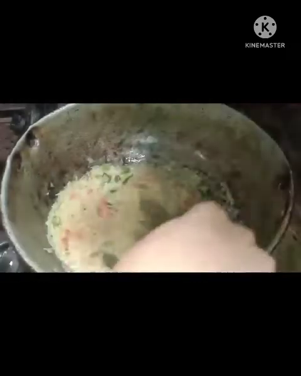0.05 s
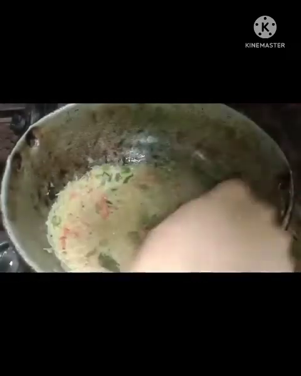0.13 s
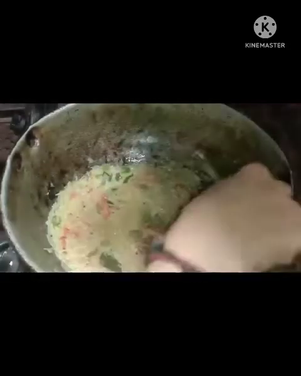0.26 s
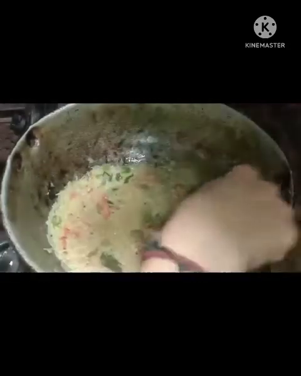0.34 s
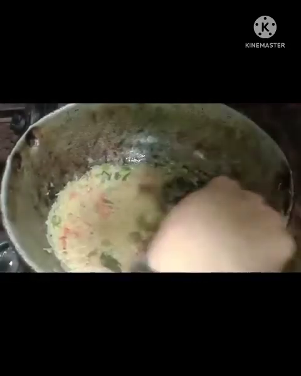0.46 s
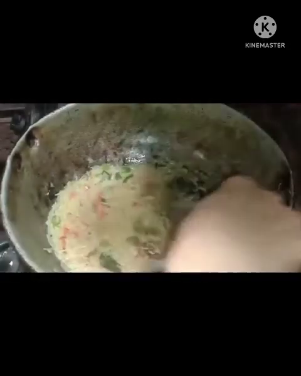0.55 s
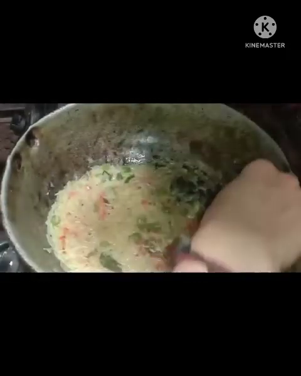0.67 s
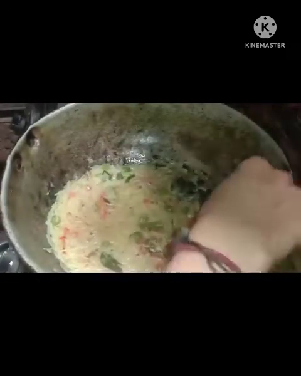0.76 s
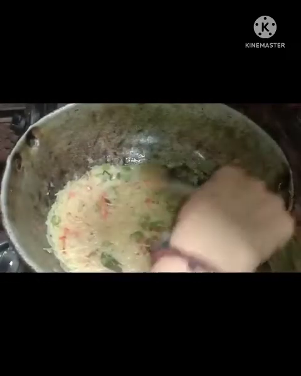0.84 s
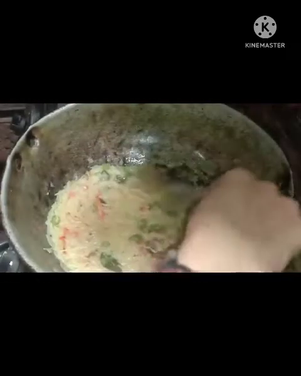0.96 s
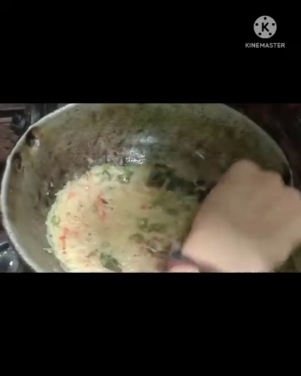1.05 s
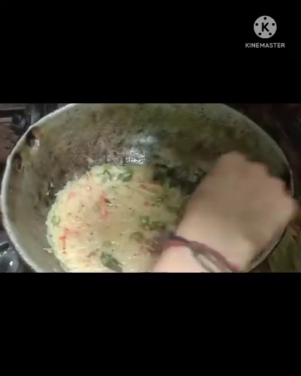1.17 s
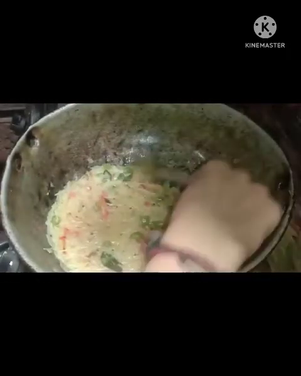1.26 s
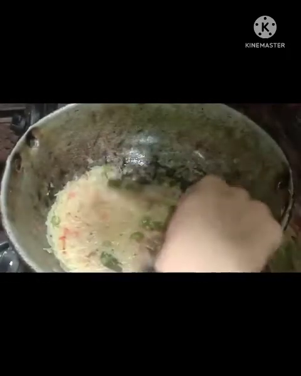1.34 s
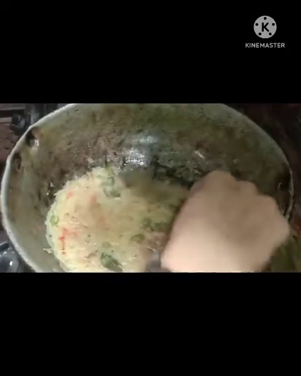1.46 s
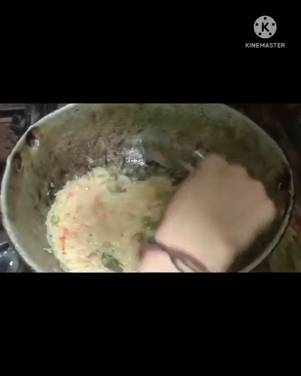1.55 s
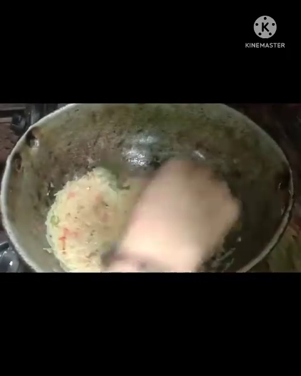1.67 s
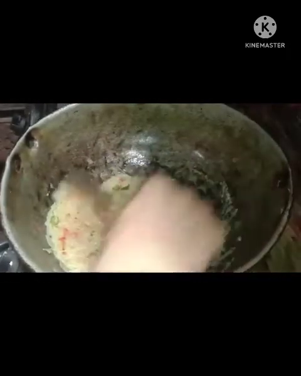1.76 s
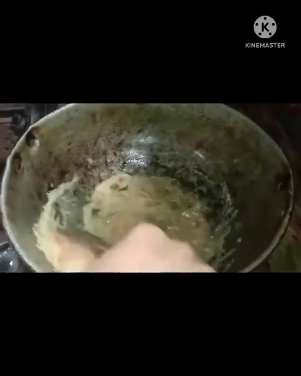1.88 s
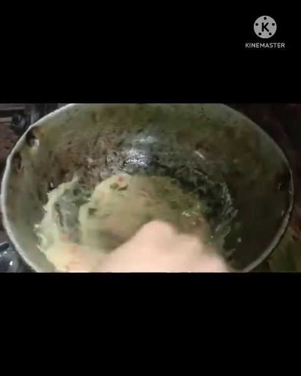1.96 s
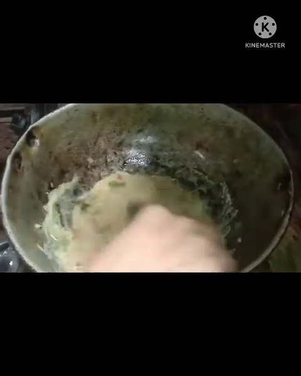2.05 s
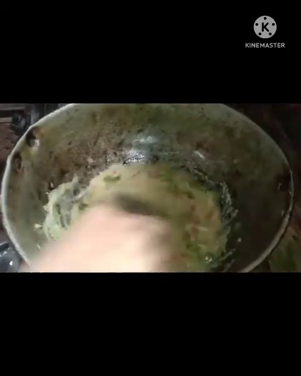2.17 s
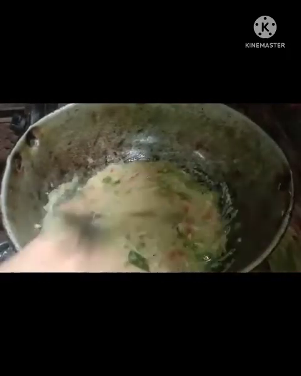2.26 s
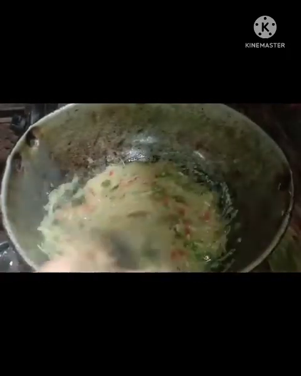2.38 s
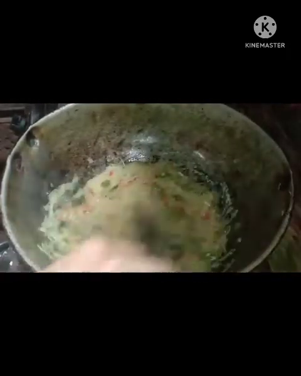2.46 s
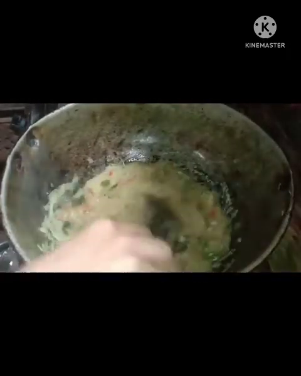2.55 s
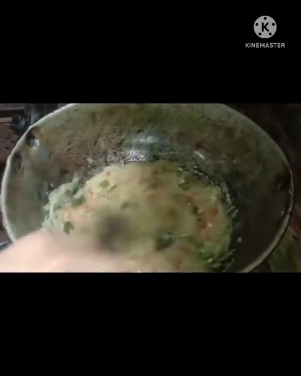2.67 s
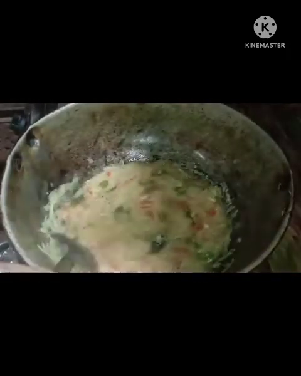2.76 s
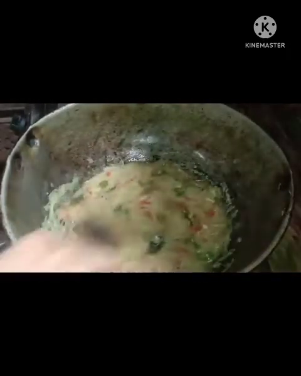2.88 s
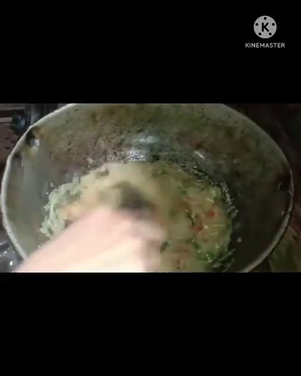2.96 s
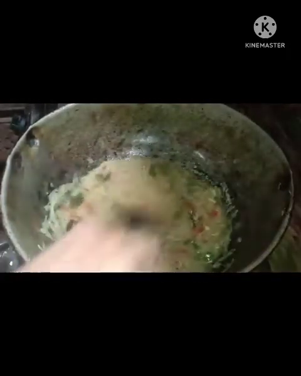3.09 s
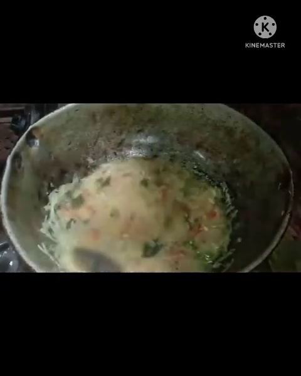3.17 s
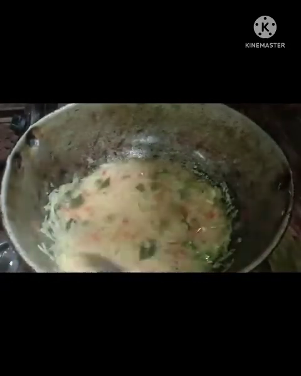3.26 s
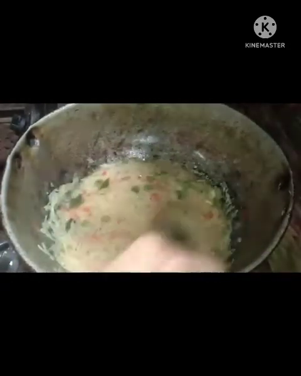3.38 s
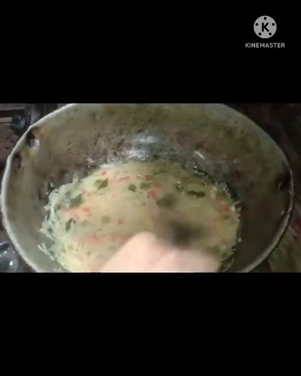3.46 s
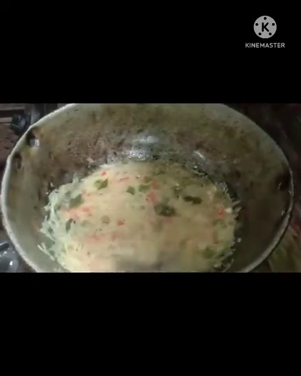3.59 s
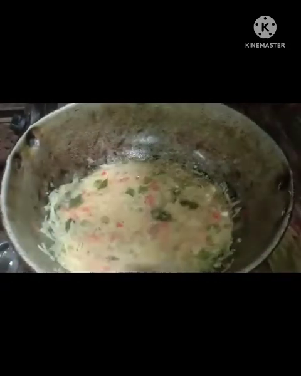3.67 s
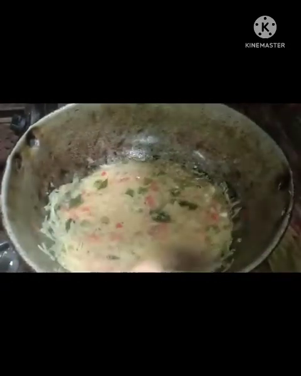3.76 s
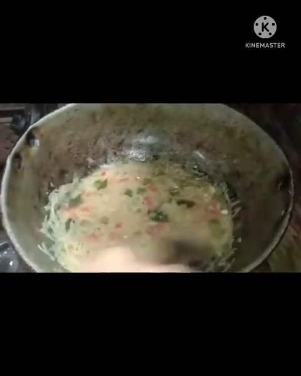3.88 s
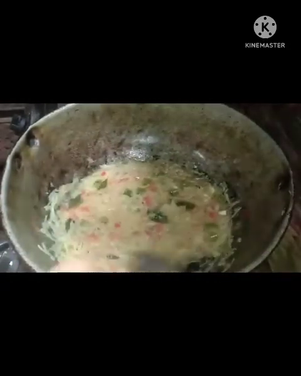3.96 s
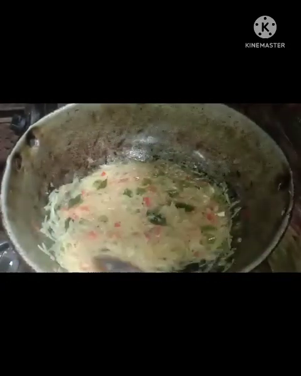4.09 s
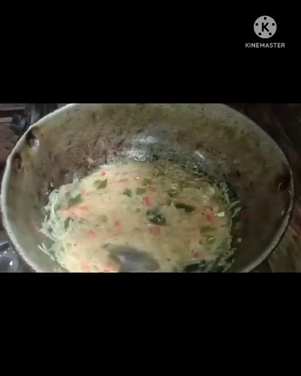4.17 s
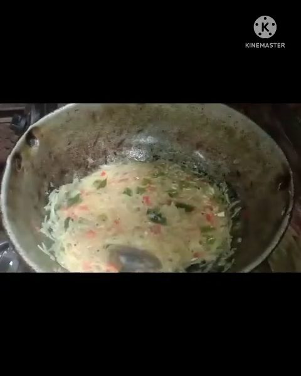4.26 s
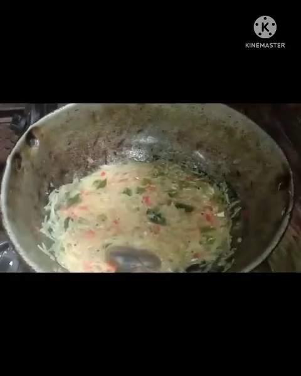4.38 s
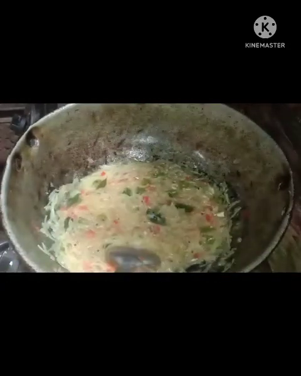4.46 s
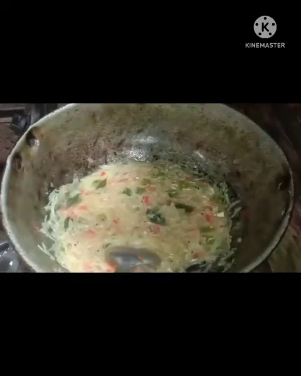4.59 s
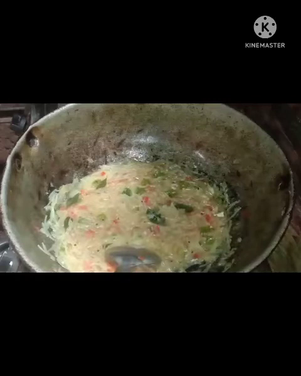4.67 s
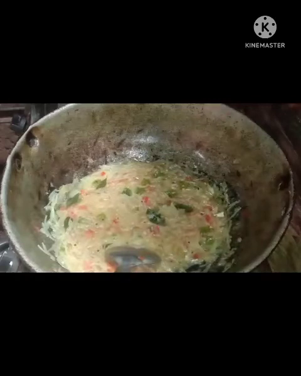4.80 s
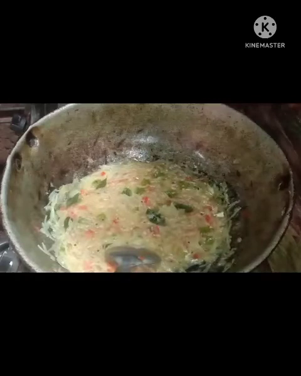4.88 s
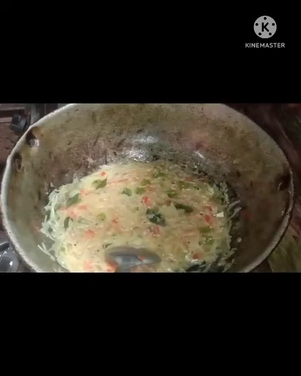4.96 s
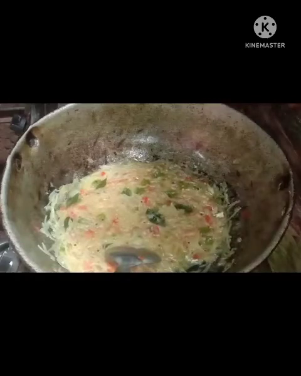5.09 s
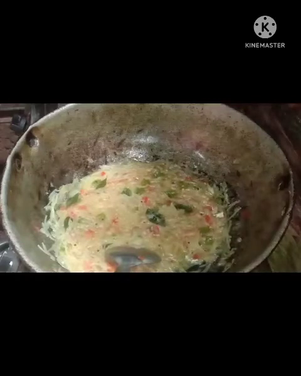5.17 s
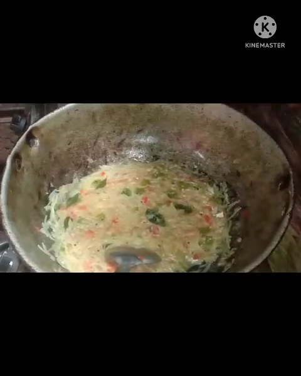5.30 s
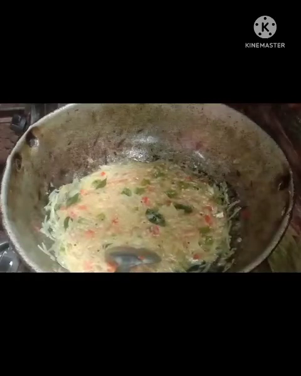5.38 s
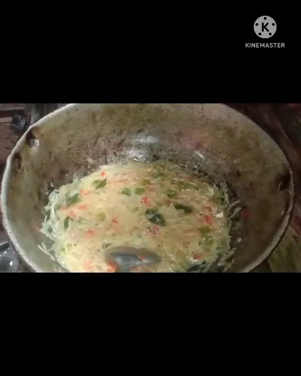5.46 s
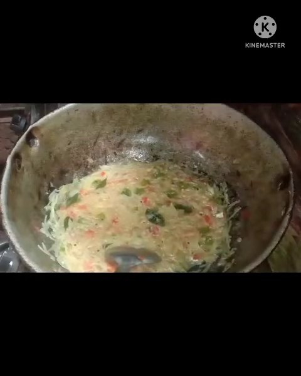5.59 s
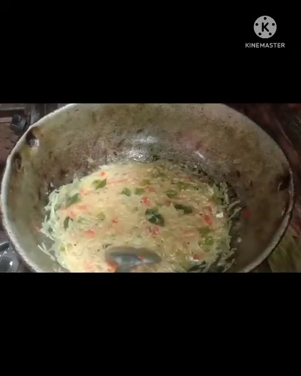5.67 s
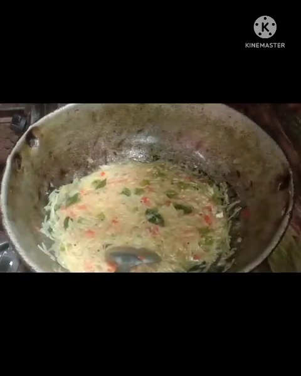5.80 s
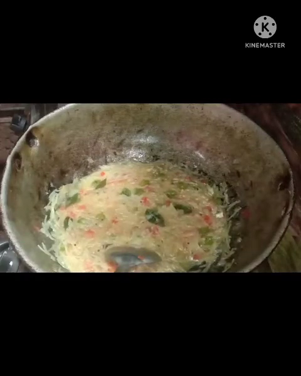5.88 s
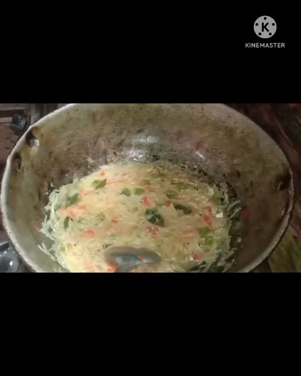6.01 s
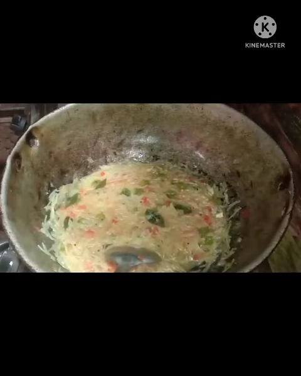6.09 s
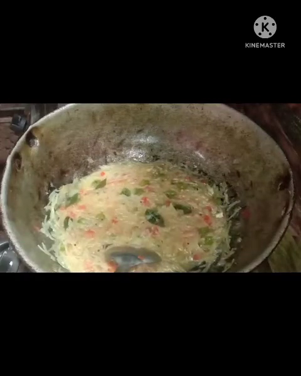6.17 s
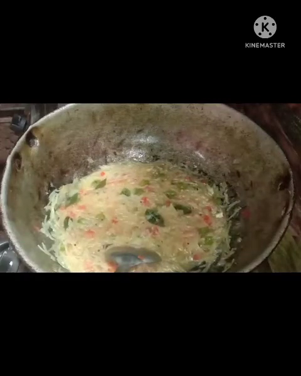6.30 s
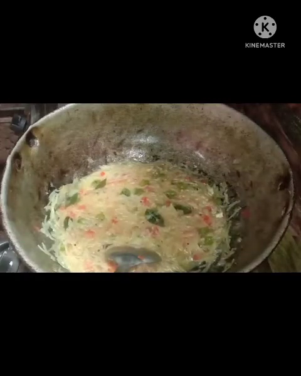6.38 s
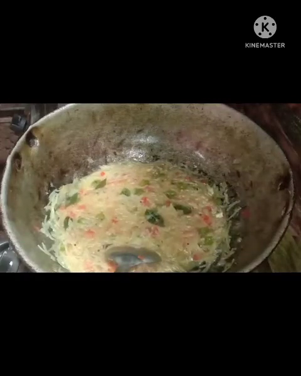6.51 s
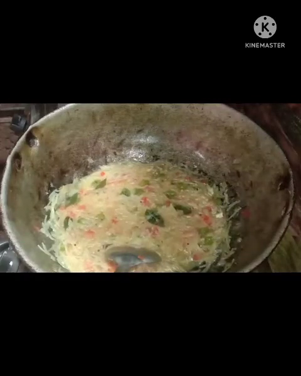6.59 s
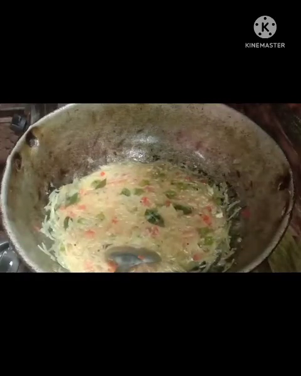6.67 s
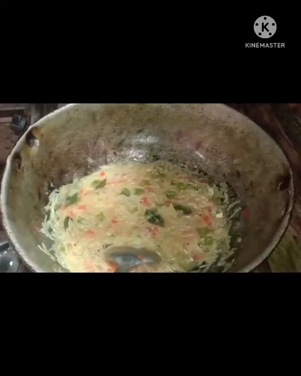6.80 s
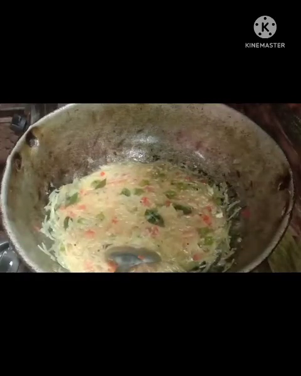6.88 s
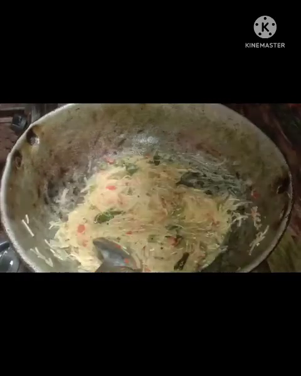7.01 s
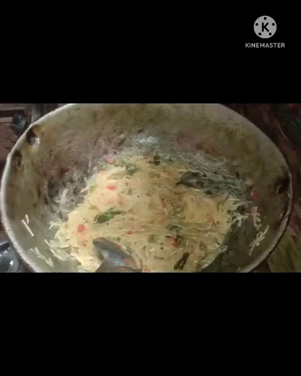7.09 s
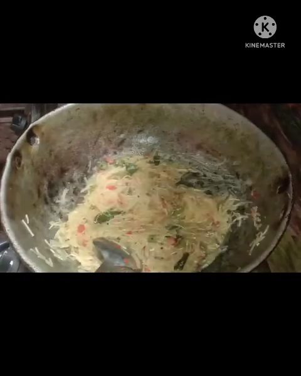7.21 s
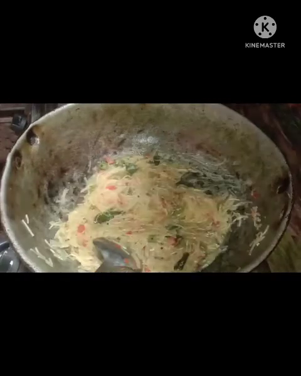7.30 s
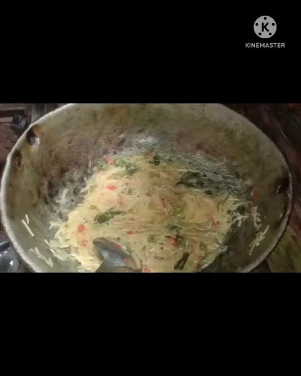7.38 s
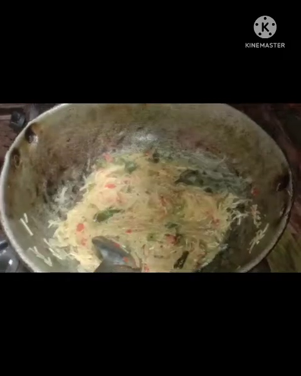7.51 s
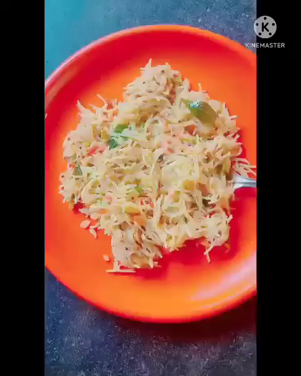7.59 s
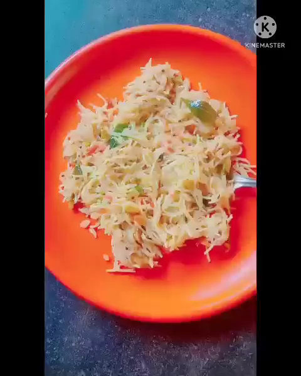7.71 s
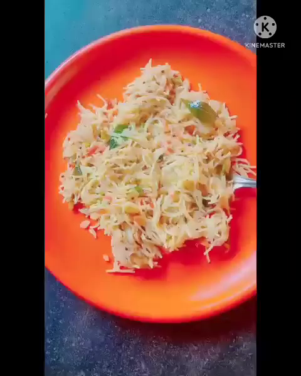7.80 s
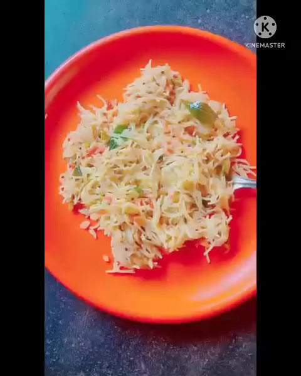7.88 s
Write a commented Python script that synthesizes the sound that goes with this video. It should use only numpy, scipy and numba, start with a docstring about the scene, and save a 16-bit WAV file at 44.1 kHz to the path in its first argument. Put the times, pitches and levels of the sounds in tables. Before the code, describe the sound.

Brisk stirring of noodles in a metal wok, heard very near with a short room tail. Dense clanks with little ring alternate with rough scrapes and tiny metallic chirps, over a faint simmer. The spatula stops around four seconds, leaving soft frying crackles, occasional droplet snaps and an airy hiss. Around seven seconds the sound drops out for a moment, returns, then ends abruptly before faint room noise.

```python
"""Stirring noodles in a wok

A metal spatula stirs moist noodles in a heavy metal wok, close up in a small kitchen. Each blow rings
dense noise, wok and blade modes; scrapes drive the wok with slips and gritty pings, and squeaks are narrow noise.
Under it all, and alone once the spatula rests, food sizzles in clicks and pings with a hollow, noisy steam hiss.
Near the end the level dips briefly; later the sound is cut off, and a faint low room noise fades in.
"""
import sys
import numpy as np
from scipy import signal
from scipy.fft import rfft, irfft
from scipy.io import wavfile
from numba import njit

SR = 44100
rng = np.random.default_rng(int(sys.argv[2]) if len(sys.argv) > 2 else 0)


def int16_out(signal):
    """Quantize to a 16-bit WAV file."""
    q = np.round(np.clip(np.atleast_2d(signal).T, -1, 1) * 32767)
    wavfile.write(sys.argv[1], SR, q.astype(np.int16))


N = 350506
TIME = np.arange(N) / SR
RING_TIME = np.arange(SR // 3) / SR

# All levels are relative mix levels, ahead of the fader.
# The blade lands; the last level is the spatula's own ring:
# start_s, body_db, clank_db, edge_db, spatula_db
BLOWS = [(0.2644, -23.5, -31.5, -26.5, -36.5), (0.328, -29.5, -36.5, -37, -35.5),
         (0.382, -26, -30.5, -28.5, -49.5), (0.4645, -34.5, -43.5, -42.5, -48.5),
         (0.7179, -27, -33, -26.5, -46), (0.800, -34.5, -37, -40, -38), (1.1222, -25.5, -36.5, -32, -49.5),
         (1.414, -51.5, -49, -65.5, -50.5), (1.438, -42, -43, -68.5, -48), (1.556, -23.5, -32, -26, -44),
         (1.701, -36, -42, -25, -61.5), (1.833, -40, -47, -38, -42), (1.9144, -50.5, -48, -69, -58),
         (2.015, -37, -47, -45, -58), (2.184, -34, -41, -38, -52), (2.487, -46, -60, -30.5, -54),
         (2.868, -41, -41, -38, -58.5), (2.892, -36.5, -30.5, -44.5, -46), (3.3425, -39, -34, -41.5, -35.5),
         (3.388, -37, -33.5, -38, -42), (3.506, -42, -41.5, -39, -55.5), (3.527, -45.5, -35, -34.5, -48.5),
         (3.576, -56, -46, -67, -59.5), (3.621, -59, -54, -41, -46), (3.633, -37, -29, -27.5, -34.5),
         (3.672, -42, -41.5, -51, -46.5), (4.337, -61, -48, -45.5, -41)]
# The blade is pushed along the wok; the faint, dull rows are noodles slumping after a stroke.
# Each is at full strength from full_s after a swell: full_s, swell_s, held_s, body_db, clank_db, edge_db
STROKES = [(0.333, 0.0058, 0.0073, -39, -34.5, -33.5), (0.391, .008, 0.027, -39, -41, -32),
           (0.48, 0.016, 0.047, -52, -60, -75.5), (0.74, .01, 0.043, -43, -51, -42),
           (0.80, .04, 0.05, -32, -37, -27.5), (1.14, 0.011, 0.11, -40, -47.5, -37),
           (1.255, .03, 0.049, -32, -34.5, -28), (1.445, .012, 0.0045, -41.5, -48, -65),
           (1.48, 0.024, 0.067, -52.5, -65, -75), (1.585, 0.0083, .055, -42, -53, -39),
           (1.668, 0.024, 0.11, -30.5, -37.5, -29.5), (1.832, 0.0065, 0.0018, -45, -46, -54),
           (1.87, 0.021, .1, -55.5, -57, -74), (2.03, .016, 0.083, -33.5, -36.5, -31.5),
           (2.192, 0.031, 0.0034, -41, -40.5, -36), (2.505, 0.027, 0.012, -34.5, -32.5, -34),
           (2.895, 0.031, 0.072, -29, -34.5, -31), (3.398, .01, 0.0082, -30.5, -27, -31.5),
           (3.445, .02, 0.0045, -39, -56, -65), (3.533, 0.0063, 0.0033, -41, -41.5, -61)]
# How fast a stroke fades at its end: body_db_per_s, clank_db_per_s, edge_db_per_s
RELEASE_RATES = (273.5, 311.5, 351.5)
# The blade catches and chatters on one note: middle_s, pitch_hz, level_db, half_length_s
SQUEAKS = [(0.391, 2265, -27.5, 0.015), (0.413, 1940, -35, 0.033), (0.691, 5800, -52, 0.0074),
           (0.822, 2040, -37.5, 0.02), (0.86, 7260, -34.5, 0.022), (0.885, 4870, -37.5, 0.017),
           (1.288, 6250, -31, 0.013), (1.416, 1460, -44.5, 0.0056), (1.834, 2650, -37, 0.011),
           (2.1, 245, -41, .08), (2.523, 236.7, -37, 0.037), (2.906, 640, -23, 0.0074),
           (2.93, 242, -37, .05), (2.935, 475, -32.5, .04), (2.932, 4500, -37, 0.028),
           (2.964, 5960, -37, .014), (3.405, 1206, -34.5, 0.016)]
# Modes of the loaded wok and the blade, decay ahead of the sustain factor: pitch_hz, energy_db, t60_s
WOK_MODES = [(127.8, -9, 0.73), (247.2, 2.5, .15), (360.3, -1, 0.17), (441.5, 3, 0.18), (490, -3.5, 0.1),
             (623.4, -0.5, .19), (674, -3, 0.25), (854, -15, .14), (1050, -15.5, 0.32), (1160, -8.5, 0.12),
             (1255, 0.5, 0.11), (1396, -9.5, 0.36), (1520, -7, 0.13), (1820, -11, 0.096), (1884, -10, 0.12),
             (2296, -13, 0.13), (3162, -9, 0.14), (3385, -7.5, 0.11), (3650, -10.5, 0.062),
             (4090, -3.5, 0.068), (4280, -7.5, .1), (4860, -6, 0.091), (5270, -6, 0.14), (5990, -3.5, .12),
             (6200, -2, 0.096), (7610, 0, 0.06), (7630, -3.5, 0.063), (8500, -13.5, .16)]
# Modes of the spatula: pitch_hz, energy_db, t60_s
SPATULA_MODES = [(1040, -5, .2), (1170, -6.5, 0.11), (1617, -5.5, 0.071), (1720, -0.5, 0.095),
                 (1895, -5.5, 0.09), (2660, -8, .07), (3030, -5.5, .07), (3930, -5, .07)]
# Colour of the dense, quickly damped vibration between the wok's modes: pitch_hz, density_db_per_hz
WOK_COLOUR = [(40, -37), (90, -10.5), (170, -15), (245, -4), (300, -12.5), (500, 0.5), (720, -4),
              (1050, -8.5), (2500, -14), (4200, -6.5), (8000, -8.5), (9800, -19.5), (13700, -32),
              (15000, -17.5)]
# Body of the wok, clank of its wall, edge of the blade: low_hz, high_hz
REGISTER_BANDS = [(40, 900), (900, 2800), (2800, 16000)]
# Slow rise and fall of the simmer; at the very end the hiss level carries the low room noise too:
# time_s, frying_db, bubbling_db, hiss_db
SIMMER_LEVELS = [(0, -61.5, -63.5, -64), (0.798, -66, -68, -71.5), (2, -58.5, -69, -71),
                 (2.7, -64, -67, -71.5), (4.2, -63.5, -65.5, -72), (4.6, -60.5, -63.5, -74),
                 (5.9, -58.5, -63, -63), (6.9, -59, -64, -62), (7.1, -60, -75, -62.5), (7.5, -56, -74, -57),
                 (7.9, -76, -67, -66.5)]
# Single pops, high ones droplets, low ones pockets of steam: start_s, level_db, pitch_hz, t60_s
POPS = [(5.196, -51.5, 538, 0.11), (5.538, -44.5, 7520, 0.033), (5.689, -47, 504, 0.038),
        (6.206, -45.5, 7500, .02), (6.526, -46, 1238, 0.08), (7.344, -46, 7600, 0.013),
        (7.4167, -39, 7630, 0.02)]
# Colour of the frying droplets: pitch_hz, density_db_per_hz
FRYING_COLOUR = [(1200, -24), (2450, -11.5), (3700, -12), (4400, -4.5), (5300, -9), (5950, -3),
                 (6600, -11.5), (7200, 1.5), (7800, 1), (8800, -9), (10200, -19), (13600, -28.5),
                 (14500, -17.5), (15500, -16.5)]
# Colour of steam bubbling up through the noodles: pitch_hz, density_db_per_hz
BUBBLING_COLOUR = [(30, -26.5), (70, -10.5), (125, -4.5), (320, 0), (440, -7), (530, 3), (740, -5),
                   (880, -10.5), (1020, -4.5), (1400, -14.5), (1950, -11), (2400, -25)]
# Colour of the hollow hiss of steam escaping from the food, resonating in the wok:
# pitch_hz, density_db_per_hz
STEAM_COLOUR = [(30, -24), (120, -7), (220, -12), (900, -17.5), (1170, -10), (1255, 6), (1360, -13),
                (1480, -4.5), (1700, -15), (1920, -5.5), (2200, -21.5), (2450, -15.5), (3200, -16),
                (9000, -38)]
# The overall level dips, recovers, then is cut off and fades in again: time_s, gain_db
FADER = [(6.92, 1.5), (6.965, -16.5), (6.985, -45), (7.06, -25.5), (7.09, -4.5), (7.125, 2), (7.615, 1.5),
         (7.645, -75.5), (7.7, -46.5), (7.8, -20.5), (7.88, -6.5)]

REGISTER_FILTERS = [signal.butter(3, edges, "band", fs=SR, output="sos") for edges in REGISTER_BANDS]
SPEED_UP_DB_PER_S = 29  # the blade gathers speed during a push, and its edge grows brighter
BLOW_RING_DB = -3.5  # ring of the wok's modes against the dense body of a blow
TOP_HZ = 15600


def blows(mode_rings, thud):
    """The blade lands: a sharp clack, a short ring of wok and spatula, the kitchen's tail."""
    out = np.zeros(N)
    spatula = unit_energy(sum(undb(db) * ringing(hz, t60) for hz, db, t60 in SPATULA_MODES))
    for start_s, body_db, clank_db, edge_db, spatula_db in BLOWS:
        body, clank, edge = wok_response(mode_rings, thud, direct_db=-2.1, dense_t60=0.048,
                                         modes_db=BLOW_RING_DB, room_db=-10.5, room_t60=0.19, spot_db=3.0)
        blow = undb(body_db) * body + undb(clank_db) * clank + undb(edge_db) * edge
        blow = blow + undb(spatula_db) * spatula
        # a light touch stays in contact longer and so is duller
        blow = roll_off(blow, hz=20000 * undb(0.56 * (edge_db + 31)), kind="low")
        # the small wok radiates little deep bass
        blow = roll_off(blow, hz=70, kind="high")
        # a blow packs the energy of 8.4 ms of rubbing into one instant
        add(out, start_s, blow * np.sqrt(0.0084 * SR))
    return out


def strokes(mode_rings, thud):
    """Slips of the blade and grit under its edge tap the wok; faint, dull strokes are noodles slumping."""
    out = np.zeros(N)
    for full_s, swell_s, held_s, body_db, clank_db, edge_db in STROKES:
        t = RING_TIME - swell_s
        force = rubbing(len(t))
        # the grip of the edge flutters as it rides over crust and food
        force = force * undb(1.74 * walk(RING_TIME, per_s=150))
        # sliding hardly shakes the wok as a whole
        force = roll_off(force, hz=175, kind="high")
        registers = wok_response(mode_rings, thud, direct_db=1.5, dense_t60=0.014,
                                 modes_db=-3.0, room_db=-21, room_t60=0.2, spot_db=4.0)
        speed_db = SPEED_UP_DB_PER_S * (np.minimum(t, held_s) - held_s / 2)
        levels = (body_db, clank_db, edge_db + speed_db)
        for db, release, response in zip(levels, RELEASE_RATES, registers):
            # the colour shifts as the stroke travels over the wall
            gain = undb(db + 1.2 * walk(RING_TIME, per_s=60))
            gain = gain * pressure(t, swell_s, held_s, release)
            add(out, full_s - swell_s, signal.fftconvolve(force * gain, response))
    return out


def rubbing(count):
    """Raw friction force: dry slips, gritty pings and longer pings of chatter."""
    slips = undb(-7.5) * clicks(count, per_s=3000, spread_db=4.0)
    grit = undb(-7.0) * grains(count, per_s=4500, spread_db=3.5, t60=0.015, top_hz=15880)
    # the slips also lock briefly on to resonances
    chatter = undb(-9.0) * grains(count, per_s=900, spread_db=4.0, t60=0.05, top_hz=9000)
    return slips + grit + chatter


def pressure(t, swell_s, held_s, release_db_per_s):
    """Strength of one stroke: it swells until t = 0, holds, then lets up."""
    return np.clip(1 + t / swell_s, 0, 1) * undb(-release_db_per_s * np.maximum(t - held_s, 0))


def squeaks(width=0.039):
    """Brief, rough notes where the slips lock on to one resonance: swells of narrow-band noise."""
    out = np.zeros(N)
    for middle_s, hz, db, half_length_s in SQUEAKS:
        swell = np.hanning(int(2 * half_length_s * SR))
        noise = rng.standard_normal(SR // 4)
        # the end of the noise, after the filter has settled
        note = band(noise, hz * (1 - width), hz * (1 + width), order=2)[-len(swell):]
        add(out, middle_s - half_length_s, undb(db) * swell * note / np.std(note))
    return out


def wok_response(mode_rings, thud, direct_db, dense_t60, modes_db, room_db, room_t60, spot_db):
    """The wok's answer to one tap at one spot, split into registers of equal energy."""
    body = tail(dense_t60) + undb(room_db) * tail(room_t60)
    body[0] -= undb(direct_db)  # the direct tap
    body = signal.fftconvolve(body, thud)[:len(RING_TIME)]
    # each spot on the wall favours other modes
    spot_gains = undb(spot_db * rng.standard_normal((len(mode_rings), 1)))
    modes = np.sum(spot_gains * mode_rings, axis=0)
    response = unit_energy(body) + undb(modes_db) * unit_energy(modes)
    return [unit_energy(signal.sosfilt(sos, response)) for sos in REGISTER_FILTERS]


def wok_modes(sustain):
    """The ring of each mode of the wok, neighbours in opposite phase; sustain scales the decay time."""
    rings = [undb(db) * ringing(hz, t60 * sustain) * (-1) ** k
             for k, (hz, db, t60) in enumerate(WOK_MODES)]
    return np.array(rings)


def simmer():
    """Droplets burst on the hot metal, steam bubbles softly through the food and escapes with a hiss."""
    time_s, *levels = np.transpose(SIMMER_LEVELS)
    fry_gain, bubble_gain, hiss_gain = (np.interp(TIME, time_s, undb(db)) for db in levels)
    # moisture reaches the metal in small surges that lift frying and bubbling together
    surge = undb(1.7 * walk(TIME, per_s=14))
    food = frying(fry_gain * surge) + bubbling(bubble_gain * surge)
    add_pops(food)
    # the kitchen gives the food a short tail
    kitchen = undb(-5.5) * tail(0.14)
    kitchen[0] += 1
    return signal.oaconvolve(food, unit_energy(kitchen))[:N] + steam_hiss(hiss_gain)


def frying(gain):
    """Bursting droplets: dry snaps and tiny pitched pings, in uneven flurries."""
    snaps = undb(-6.5) * clicks(N, per_s=600, spread_db=4.0)
    pings = undb(-3.0) * grains(N, per_s=2600, spread_db=4.5, t60=0.023, top_hz=15900)
    flurries = undb(2.2 * walk(TIME, per_s=33))
    return signal.oaconvolve(gain * (snaps + pings) * flurries, colour(FRYING_COLOUR))[:N]


def bubbling(gain):
    """Steam bubbles in the food: overlapping low pings that waver in level."""
    pings = grains(N, per_s=900, spread_db=2.5, t60=0.055, top_hz=2590)
    waver = undb(1.3 * walk(TIME, per_s=18) - 0.4)
    return signal.oaconvolve(gain * waver * pings, colour(BUBBLING_COLOUR))[:N]


def add_pops(food):
    """Single droplets and pockets of steam burst, each a decaying sine."""
    for start_s, db, hz, t60 in POPS:
        add(food, start_s, undb(db) * np.sin(2 * np.pi * hz * RING_TIME) * decay(t60))


def steam_hiss(gain):
    """Steam escapes from the food and resonates in the wok: coloured noise with a restless level."""
    flutter = undb(5.2 * walk(TIME, per_s=30) - 4.5)
    return signal.oaconvolve(rng.standard_normal(N) * gain * flutter, colour(STEAM_COLOUR))[:N]


def clicks(count, per_s, spread_db):
    """Randomly timed clicks of uneven size and either sign, rms 1."""
    sizes = undb(spread_db * np.minimum(rng.exponential(size=count), 4))
    struck = rng.random(count) < per_s / SR
    train = struck * sizes * rng.choice([-1, 1], count)
    return unit_energy(train + 1e-9) * np.sqrt(count)


def grains(count, per_s, spread_db, t60, top_hz):
    """Tiny pings of random time, pitch, length and size; as strong per Hz as unit white noise."""
    when, pitch, length, size = rng.random((int(per_s * count / SR) + 1, 4)).T
    starts = (when * count).astype(np.int64)
    samples = t60 * (0.5 + length) * SR
    turn = 2 * np.pi * top_hz * pitch / SR
    keep = np.exp(-np.log(1000) / samples)
    sizes = undb(-spread_db * np.log(size + 0.02))
    pings = ring_grains(count, starts, samples.astype(np.int64), turn, keep, sizes)
    return unit_energy(pings) * np.sqrt(count * 2 * top_hz / SR)


@njit
def ring_grains(out_size, starts, lengths, turn, keep, sizes):
    """Sum of damped oscillations; each turns by `turn` radians and keeps a share `keep` every sample."""
    out = np.zeros(out_size)
    for k in range(len(starts)):
        feedback = 2 * keep[k] * np.cos(turn[k])
        loss = keep[k] * keep[k]
        last, now = 0., sizes[k] * np.sin(turn[k])
        for i in range(starts[k], min(out_size, starts[k] + lengths[k])):
            out[i] += now
            last, now = now, feedback * now - loss * last
    return out


def ringing(hz, t60):
    """One struck mode: a decaying sine of energy 1."""
    return unit_energy(np.sin(2 * np.pi * hz * RING_TIME) * decay(t60))


def tail(t60):
    """Countless overlapping rings or reflections that die away together, as decaying noise."""
    return unit_energy(rng.standard_normal(len(RING_TIME)) * decay(t60))


def decay(t60):
    """Envelope that falls 60 dB in t60 seconds."""
    return np.exp(-np.log(1000) * RING_TIME / t60)


def walk(t, per_s):
    """Random wander with a spread near 1: random points joined by straight lines."""
    return np.interp(t * per_s, np.arange(4096), rng.standard_normal(4096))


def colour(points, size=2048):
    """Causal response with a (Hz, dB) spectrum, from the folded cepstrum."""
    hz, db = np.transpose(points)
    bins_hz = np.maximum(np.arange(size // 2 + 1) * SR / size, 1)
    spectrum_db = np.interp(np.log(bins_hz), np.log(hz), db)
    cepstrum = irfft(np.log(undb(spectrum_db)))
    cepstrum[1:size // 2] *= 2
    cepstrum[size // 2 + 1:] = 0
    return unit_energy(irfft(np.exp(rfft(cepstrum))))


def band(x, low_hz, high_hz, order=3):
    """Causal band-pass."""
    return signal.sosfilt(signal.butter(order, [low_hz, high_hz], "band", fs=SR, output="sos"), x)


def roll_off(x, hz, kind):
    """Gentle second-order low-pass or high-pass."""
    return signal.sosfilt(signal.butter(2, min(hz, 0.45 * SR), kind, fs=SR, output="sos"), x)


def undb(db):
    """Decibels to gain."""
    return 10 ** (np.asarray(db) / 20)


def unit_energy(x):
    """Scale a response so that it passes white noise at the same level."""
    return x / np.sqrt(np.sum(x ** 2))


def add(out, start_s, x):
    """Mix a sound in at its time."""
    i = max(int(start_s * SR), 0)
    out[i:i + len(x)] += x[:len(out) - i]


def scene():
    """Blows, strokes and squeaks of the spatula over the simmering food."""
    thud = colour(WOK_COLOUR)
    # the wok rings freely after a blow; a blade pressed against it damps the modes
    struck = blows(wok_modes(sustain=0.93), thud)
    stroked = strokes(wok_modes(sustain=0.43), thud)
    return (struck + stroked + squeaks() + simmer())[None]


def record(dry):
    """The level follows the fader and a steep low-pass cuts the top."""
    faded = dry * undb(np.interp(TIME, *np.transpose(FADER)))
    return signal.sosfilt(signal.ellip(10, 0.2, 70, TOP_HZ, fs=SR, output="sos"), faded)


dry = scene()
out = record(dry)
int16_out(out)
```